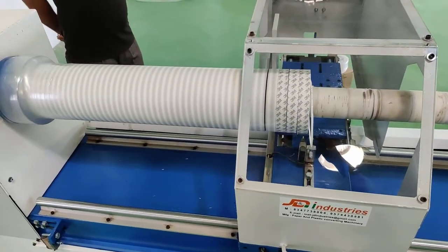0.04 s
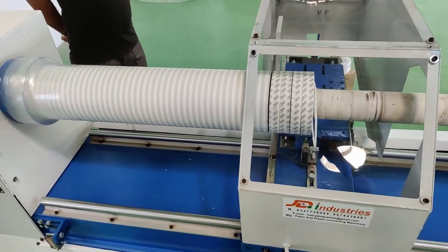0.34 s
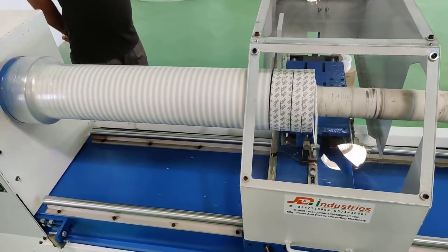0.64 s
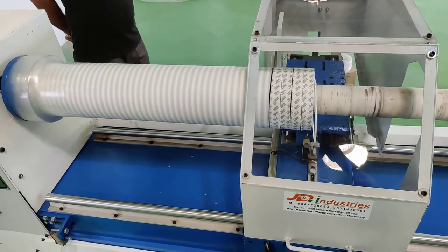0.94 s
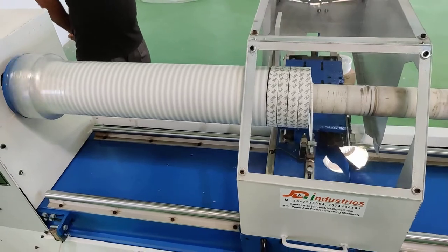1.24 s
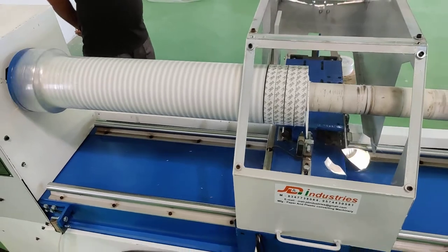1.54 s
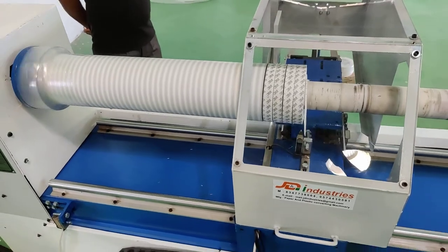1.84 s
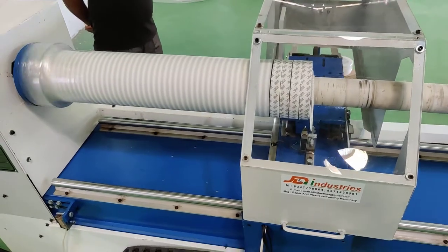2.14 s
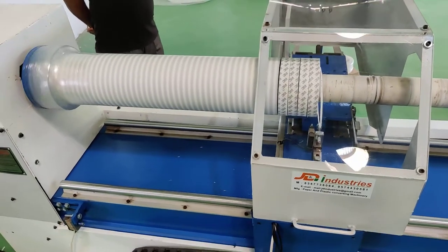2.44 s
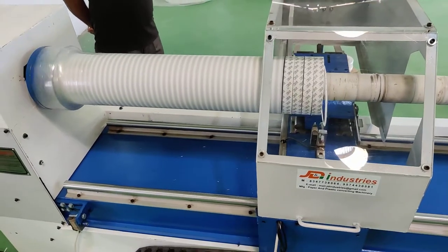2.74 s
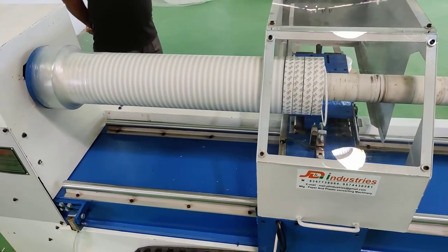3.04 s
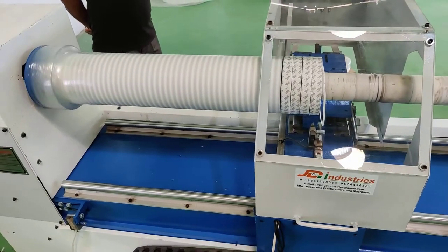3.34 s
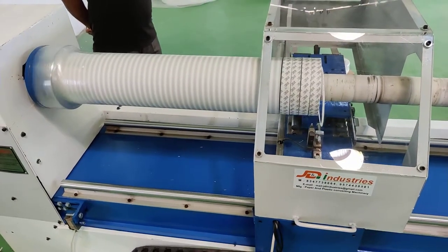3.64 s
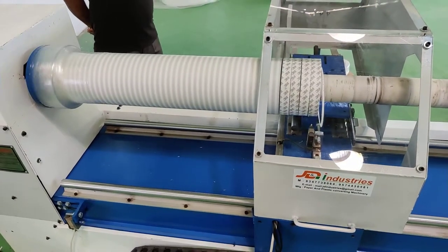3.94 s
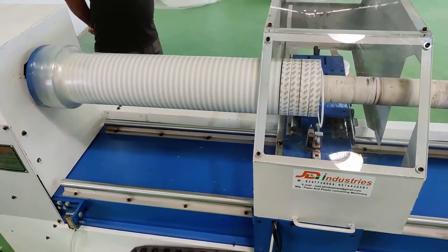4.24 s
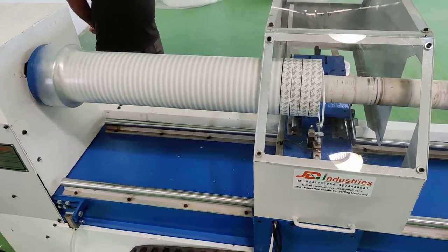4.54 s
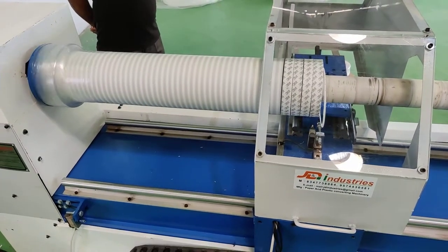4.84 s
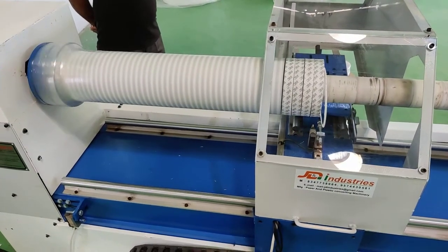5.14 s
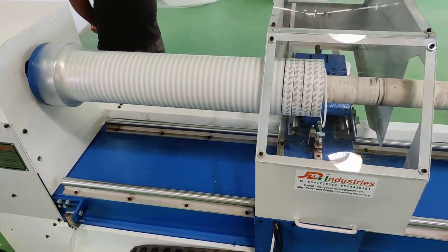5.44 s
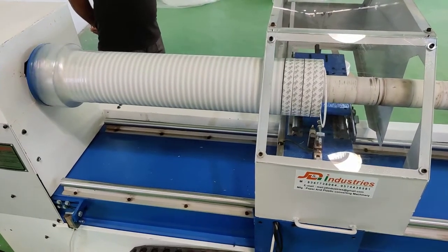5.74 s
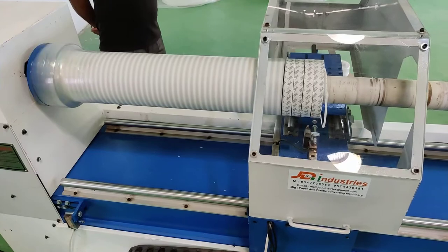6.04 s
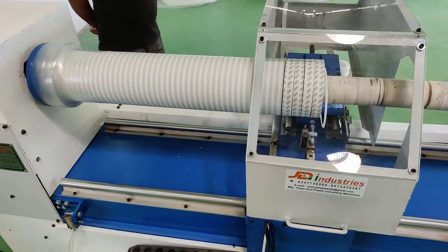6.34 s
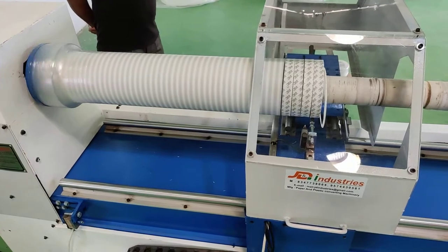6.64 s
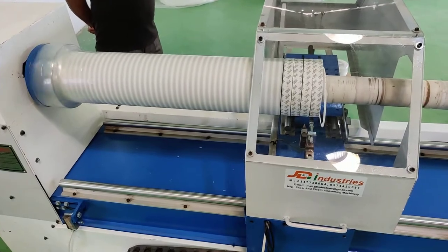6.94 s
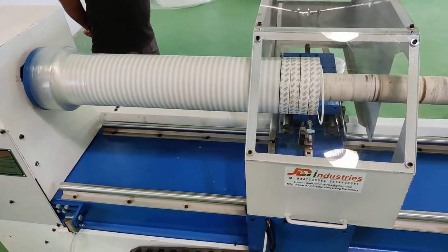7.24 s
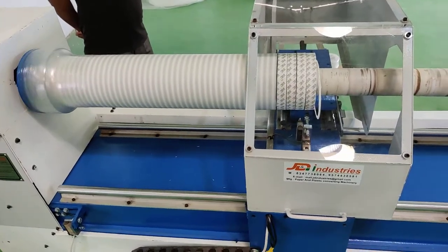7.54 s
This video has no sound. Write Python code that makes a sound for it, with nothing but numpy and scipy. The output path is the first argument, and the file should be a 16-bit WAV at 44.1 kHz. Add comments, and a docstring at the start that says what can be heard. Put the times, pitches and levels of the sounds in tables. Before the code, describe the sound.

A tape slitting machine runs a step away in a factory hall, with a throbbing motor hum, a faint whine and a roar of fan air. Its blade scuffs the spinning roll in a quick rhythm. At the start the machine moans and clacks, the blade squeals and the tape crackles. A deep drone climbs and fades while the motor slowly sags. Around six seconds, more clacks and another moan come.

```python
"""A throbbing motor hum and a roar of fan air: a tape slitting machine, a step away in a factory hall.
The motor slowly sags under load while a second, deep drone climbs; housing panels colour the air.
Rough spots on the spinning roll scuff the blade, twice a turn strongly and once faintly.
Early on the blade sticks, slips and squeals, and the tape crackles as it gives way.
The machine moans and its mechanism clacks near the start and again around 6 s."""
import sys
import numpy as np
from scipy import signal
from scipy.fft import rfft, irfft
from scipy.io import wavfile

SR = 44100
rng = np.random.default_rng(int(sys.argv[2]) if len(sys.argv) > 2 else 0)


def master_out(mix):
    """Clip the mix to full scale and print it as 16-bit PCM to the path in sys.argv[1]."""
    frames = np.transpose(np.atleast_2d(mix))
    ceiling = np.clip(frames, -1, 1)
    pcm = np.round(ceiling * 32767).astype(np.int16)
    wavfile.write(sys.argv[1], SR, pcm)


N = 343098
TIME, HZ = np.arange(N) / SR, np.fft.rfftfreq(N, 1 / SR)

# Stereo balance of the blade noise. Each row: frequency in Hz, left minus right in dB.
BLADE_BALANCE = [(2000, 8), (5000, -1.5), (6000, -6.5), (6700, -6.5), (7300, -0.5), (7900, -1.5)]
BLADE_LAG_S = .00038


def amp(db):
    """Decibels to gain."""
    return 10 ** (np.asarray(db) / 20)


def unit(x):
    """Scale to rms 1."""
    return x / np.sqrt(np.mean(abs(x) ** 2) + 1e-20)


def spectrum(points):
    """Interpolate (Hz, value) points on a log-frequency axis."""
    hz, value = np.transpose(points)
    return np.interp(np.log(HZ + 1), np.log(hz + 1), value)


def curves(rows):
    """Interpolate each value column of (seconds, ..) rows at every sample."""
    time_s, *columns = np.transpose(rows)
    return [np.interp(TIME, time_s, column) for column in columns]


def drift(rate_hz):
    """Smooth random motion of rms 1, up to about rate_hz."""
    count = 4096
    lowpass = np.exp(-.5 * (HZ[:count // 2 + 1] / rate_hz) ** 2)
    slow = irfft(rfft(rng.standard_normal(count)) * lowpass)
    return unit(np.interp(np.arange(N) * count / N, np.arange(count), slow))


def pan(balance_db):
    """Stereo gains for a left-minus-right level."""
    return amp(np.array([[.5], [-.5]]) * balance_db)


def noise(density_db, balance_db, coherence=0, lag_s=0):
    """Stereo noise of a given density per Hz; the coherent part lags on the right."""
    left, other = rfft(rng.standard_normal((2, N)))
    coherence = np.clip(coherence, -1, 1)
    right = coherence * left * np.exp(-2j * np.pi * HZ * lag_s) + np.sqrt(1 - coherence ** 2) * other
    return irfft(np.array([left, right]) * amp(density_db) * pan(balance_db) * np.sqrt(SR / 2), N)


def tone(hz):
    """Sine of rms 1 along a pitch curve."""
    return np.sqrt(2) * np.sin(2 * np.pi * (np.cumsum(hz) / SR + rng.random()))


def bursts(rows, rise_s, hall_db, hall_s):
    """Envelope of blows: fast rise, exponential power decay, hall tail."""
    power = np.zeros(N)
    for start_s, db, decay_s in rows:
        start = int(start_s * SR)
        t = TIME[:N - start][:SR]
        decay = np.exp(-t / decay_s) + amp(hall_db) ** 2 * np.exp(-t / hall_s)
        power[start:start + len(t)] += amp(db) ** 2 * decay * (1 - np.exp(-t / rise_s))
    return np.sqrt(power)


def rough_tones(rows, roughness, balance_db):
    """Brief swelling tones, unsteady in pitch and strength."""
    out = np.zeros((2, N))
    for start_s, length_s, hz, db, width_hz in rows:
        active = (TIME >= start_s) & (TIME < start_s + length_s)
        t = TIME[active] - start_s
        swell = amp(db) * np.sqrt(abs(np.sin(np.pi * t / length_s)))
        for side in out:
            jitter = drift(width_hz / 2) + 1j * drift(width_hz / 2)
            ring = unit(1 + roughness * jitter[active]) * np.exp(2j * np.pi * hz * t)
            side[active] += np.sqrt(2) * swell * ring.real
    return out * pan(balance_db)


def motor(throb_db=1.5, throb_hz=4, wander_hz=.25, jitter_hz=.25, upper_db=-46):
    """Five throbbing shaft orders sag under load; the higher ones are less steady in pitch."""
    # Each row: time in seconds, shaft speed in Hz.
    shaft_speed = [(0, 38.1), (.2, 38.6), (.87, 38.9), (1.25, 37.2), (1.75, 38.7), (3.25, 38.8),
                   (4.55, 37.3), (5.25, 35.8), (5.8, 36.3), (6.25, 35.4), (6.6, 35.3), (6.9, 34.7),
                   (7.78, 35)]
    # Each row: time in seconds, levels of orders 1, 2 and 3 in dB.
    order_levels = [(0, -37, -32, -32.5), (.3, -27, -31.5, -32), (.75, -32.5, -45, -30.5),
                    (1.05, -41, -26, -27), (1.2, -36, -35, -44.5), (1.8, -42, -29, -33),
                    (2.02, -31, -37.5, -38.5), (2.25, -34, -26, -37), (2.45, -23.5, -48, -36.5),
                    (2.8, -32.5, -32, -35.5), (3.0, -24.5, -37.5, -49), (3.27, -32, -26, -28),
                    (3.4, -28, -48, -43), (3.62, -30, -29, -32), (3.82, -33.5, -33, -41),
                    (4.38, -28.5, -35.5, -31), (4.55, -25, -24.5, -45), (4.92, -21.5, -34.5, -54),
                    (5.28, -31, -24.5, -41), (5.48, -24, -34.5, -48), (5.75, -34, -28, -32),
                    (6.12, -30.5, -41, -34), (6.5, -41, -29.5, -41), (6.72, -42, -35, -43),
                    (6.88, -36, -24.5, -45), (7.08, -28, -33, -43), (7.3, -35, -28, -44),
                    (7.78, -30, -26, -44)]
    shaft_hz = curves(shaft_speed)[0] + wander_hz * drift(3.96)
    hum = 0
    for order, db in enumerate(curves(order_levels) + [upper_db, upper_db], 1):
        hz = order * shaft_hz + jitter_hz * (order - 1) ** 2 * drift(throb_hz)
        hum += amp(db + throb_db * drift(throb_hz)) * tone(hz)
    return hum * pan(.39)


def drone(gain_db=-1, throb_db=1.5, throb_hz=4, wander_hz=.66):
    """A deep, throbbing tone climbs, then fades."""
    # Each row: time in seconds, pitch in Hz, relative level in dB.
    climb = [(0, 23.5, -42), (1.7, 28, -34), (2.12, 32.6, -24), (2.38, 30.8, -24), (2.65, 35, -27),
             (3.3, 42, -28), (3.55, 48, -46), (4.05, 55, -27), (4.3, 54.5, -29), (4.6, 60, -29.5),
             (4.95, 65, -33), (5.2, 70, -33), (5.5, 71.5, -42), (5.8, 71.5, -65)]
    hz, db = curves(climb)
    level = amp(db + gain_db + throb_db * drift(throb_hz))
    return level * tone(hz + wander_hz * drift(throb_hz)) * pan(.39)


def fan_air(gust_hz=2, flutter_db=.5, flutter_hz=25):
    """Fan and hall noise lifted by panel resonances; three bands share a swell and gust separately."""
    # Hall rumble and wash. Each row: frequency in Hz, density in dB per Hz.
    hall = [(8, -56), (22, -50.5), (55, -52.5), (100, -49.5), (135, -54.5), (185, -59), (250, -65),
            (620, -67.5), (1000, -70.5), (1300, -68.5), (1750, -74.5), (3600, -84), (6500, -87),
            (8600, -105), (10200, -106.5), (11500, -117), (13000, -120)]
    # Housing resonances. Each row: frequency in Hz, width in Hz, lift in dB.
    panels = [(235, 14, 2.6), (294, 26, 7.2), (387, 14, 3.9), (426, 60, 8), (477, 7, 3.9), (520, 60, 3.6),
              (573, 47, 5.4), (689, 46, 8.8), (723, 15, 5), (751, 41, 9.7), (802, 60, 12.2), (853, 20, 6.7),
              (882, 32, 6.6), (929, 26, 4.6), (964, 27, 4.2), (1028, 60, 5), (1123, 7, 4), (1163, 25, 4.2),
              (1208, 20, 3), (1403, 14, 3.3), (1438, 15, 3.1), (2300, 550, 2.4)]
    # Each row: frequency in Hz, left minus right in dB.
    balance = [(60, 1), (500, -0.5), (850, 2), (1500, -0.2), (2500, -3.5), (4000, -2), (6000, -3.5),
               (6800, -15), (8000, 1)]
    # Each row: frequency in Hz, left-right coherence from 0 to 1.
    coherence = [(60, 1), (130, 0.97), (250, 0.93), (480, 0.9), (780, 0.62), (1100, 0)]
    # Each row: time in seconds, swell of the rumble in dB.
    swell = [(0, 1), (1.8, 0.4), (3.2, 0), (3.7, 1), (4.7, -0.3), (5.4, 0.25), (6.1, 1.5), (6.65, -0.75),
             (7.78, -0.6)]
    lift_db = sum(db / (1 + (2 * (HZ - hz) / width_hz) ** 2) for hz, width_hz, db in panels)
    wash = rfft(noise(spectrum(hall) + lift_db, spectrum(balance), spectrum(coherence), lag_s=.00008))
    rumble = 1 / (1 + (HZ / 520) ** 4)
    hiss = 1 - 1 / (1 + (HZ / 1150) ** 4)
    roar = 1 - rumble - hiss
    swell_db = curves(swell)[0]
    out = 0
    for band, swell_share, gust_db in [(rumble, 1, -.3), (roar, .82, .5), (hiss, .5, .36)]:
        level_db = swell_share * swell_db + gust_db * drift(gust_hz) + flutter_db * drift(flutter_hz)
        out += irfft(wash * band, N) * amp(level_db)
    return out


def whines(waver_db=2, reflection_gain=.91):
    """Fan and drive tones; reflections make each side waver differently."""
    # Each row: pitch in Hz, level in dB, wander in Hz.
    tones = [(756, -46, 2.5), (1208, -55, 3), (1704, -62, 1.2)]
    out = np.zeros((2, N))
    for hz, db, wander_hz in tones:
        pitch_hz = hz + wander_hz * drift(4.95)
        direct = tone(pitch_hz)
        for side in out:
            level = amp(db + waver_db * drift(7.8))
            reflected = reflection_gain * tone(pitch_hz + wander_hz * drift(5.6))
            side += level * unit(direct + reflected)
    return out


def moans():
    """Brief machine moans, plus a rough low rumble and swell from the motor early on."""
    # Each row: start in seconds, length in seconds, pitch in Hz, level in dB, width in Hz.
    tones = [(0, .14, 800, -28, 70), (.088, .035, 780, -26, 50), (.01, .07, 2345, -49, 120),
             (.15, 1, 100, -37, 50), (.29, .085, 795, -29, 40), (.28, .25, 180, -33, 25),
             (5.88, .38, 565, -36.5, 18), (6, .22, 695, -35.5, 70), (6.04, .15, 790, -34.5, 60),
             (6.04, .17, 885, -40.5, 40), (6, .25, 1128, -45, 20), (5.95, .2, 1205, -49, 25)]
    return rough_tones(tones, roughness=.55, balance_db=1.5)


def roll_scuff(spindle_hz=8.86, rub_db=-8, runout_db=2, uneven_db=4, rise_turns=.036, slip_turns=.004):
    """Rough spots on the roll pass the blade each turn and scuff over a grainy rub."""
    # Each row: place in the turn from 0 to 1, decay in turns, relative level in dB.
    rough_spots = [(.155, 0.024, -2), (.41, 0.034, -4.5), (.555, 0.049, -14)]
    # Blade on tape. Each row: frequency in Hz, relative density in dB.
    rub_spectrum = [(1000, -100), (2500, -82), (4200, -83), (5100, -83), (5550, -77.5), (6000, -82.5),
                    (6600, -84), (7300, -89), (8200, -92), (9000, -106), (13000, -116)]
    # Fine fizz above the rub. Each row: frequency in Hz, relative density in dB.
    fizz_spectrum = [(7000, -130), (10500, -111), (11700, -111), (12400, -107), (13300, -110)]
    # Each row: time in seconds, fizz gain in dB.
    fizz_gain = [(0, 7), (.45, 7.5), (.9, 6.5), (1.3, 5), (1.6, 1), (3.2, -1), (4.7, -2.5), (5.8, 0),
                 (6.7, 3), (7.78, 1)]
    # Blade pressure on the roll. Each row: time in seconds, rub gain in dB.
    pressure = [(0, 7.5), (.1, 0), (.25, 5), (.36, 9), (.45, 5), (.6, 3), (.9, -2), (2, 2), (4, 0.5),
                (5.7, -1), (6.4, 0), (6.6, -2), (7.2, 0), (7.78, -7)]
    turns = spindle_hz * TIME + slip_turns * drift(.72)
    spot_power = 0
    for place, decay_turns, db in rough_spots:
        since = (turns - place) % 1
        spot_power += amp(db) ** 2 * np.exp(-since / decay_turns) * (1 - np.exp(-since / rise_turns))
    # Out-of-round roll: hardest rub at mid-turn.
    contact = amp(rub_db - runout_db * np.cos(2 * np.pi * turns))
    envelope = np.sqrt(2 * spot_power * amp(uneven_db * drift(14)) ** 2 + contact ** 2)
    grain = unit(amp(1.5 * drift(200)))
    rub = noise(spectrum(rub_spectrum), spectrum(BLADE_BALANCE), coherence=.52, lag_s=BLADE_LAG_S)
    fizz = noise(spectrum(fizz_spectrum), balance_db=1, coherence=.38) * amp(curves(fizz_gain)[0])
    return (rub * amp(curves(pressure)[0]) + fizz) * envelope * grain


def blade_squeals():
    """The blade sticks and slips with a raspy ring."""
    # Each row: start in seconds, length in seconds, pitch in Hz, level in dB, width in Hz.
    modes = [(.055, .11, 6140, -56, 80), (.09, .14, 6165, -44.5, 90), (.18, .21, 6140, -44.5, 130),
             (.28, .12, 5430, -56, 160), (.38, .24, 6160, -56, 90), (.64, .13, 3980, -56, 110),
             (.65, .21, 5430, -57, 100), (.86, .22, 5455, -58, 90), (1.05, .3, 6240, -57, 80),
             (1.338, .19, 6250, -53.5, 70), (2.49, .19, 4247, -55, 140)]
    return rough_tones(modes, roughness=1.7, balance_db=-6.5)


def clacks(rise_s=.0015):
    """Metal knocks in the mechanism: a crack with a short hall tail, plus ringing modes."""
    # Each row: start in seconds, gain in dB, power decay in seconds.
    knocks = [(.305, 0, .008), (.332, -10, .007), (.362, -13, .008), (.401, -6, .006), (5.841, -2.5, .007),
              (5.868, -11, .005), (5.918, -10, .004), (6.258, -12, .01)]
    # Each row: frequency in Hz, relative density in dB.
    crack_spectrum = [(500, -57.5), (1500, -72), (2100, -68), (2550, -63), (2950, -69), (3350, -66),
                      (3900, -70), (5800, -71), (7200, -79), (9000, -100), (13000, -114)]
    # Each row: frequency in Hz, relative level in dB, T60 in seconds.
    metal_modes = [(1970, -46, .15), (2200, -41, .2), (2510, -37, .1), (2890, -46, .12), (3290, -39, .07),
                   (3640, -46, .09), (5000, -45, .1), (5790, -46, .15)]
    out = noise(spectrum(crack_spectrum), balance_db=2) * bursts(knocks, rise_s, hall_db=-13, hall_s=.06)
    for start_s, db, _ in knocks:
        start = int(start_s * SR)
        t = TIME[:N - start][:SR // 2]
        for hz, mode_db, t60_s in metal_modes:
            envelope = amp(db + mode_db - 60 * t / t60_s) * (1 - np.exp(-t / rise_s))
            out[:, start:start + len(t)] += envelope * np.sin(2 * np.pi * (hz * t + rng.random((2, 1))))
    return out


def tape_snaps(snag_period_s=.1113, snag_turns=7):
    """Tape gives way at the blade in bright crackles; snags recur about once a turn, weaker each time."""
    # Each row: first snap in seconds, gain in dB, change per turn in dB, power decay in seconds.
    snags = [(.373, 7, -2.5, 0.002), (.397, 2, -2, .0035)]
    # Each row: start in seconds, gain in dB, power decay in seconds.
    single_snaps = [(.595, -3, .002), (.703, 1, .0025), (.843, -2, .0025), (.956, -7, .002),
                    (1.066, -1, .002), (2.392, -4.5, .004), (3.403, -6, .0066), (5.662, -8, .005),
                    (5.804, -6, .003), (6.27, -6, .024), (6.372, -5, .003), (6.468, -6, .003)]
    # Each row: frequency in Hz, relative density in dB.
    snap_spectrum = [(2500, -81), (4500, -81), (5500, -72.5), (7000, -73.5), (8300, -98), (9500, -99),
                     (13000, -110)]
    repeats = [(start_s + turn * snag_period_s, db + turn * change_db, decay_s)
               for start_s, db, change_db, decay_s in snags for turn in range(snag_turns)]
    crack = noise(spectrum(snap_spectrum), spectrum(BLADE_BALANCE), coherence=.44, lag_s=BLADE_LAG_S)
    return crack * bursts(repeats + single_snaps, rise_s=.0004, hall_db=-19, hall_s=.04)


def scene():
    """The whole machine, in stereo."""
    running = motor() + drone() + fan_air() + whines()
    return running + moans() + roll_scuff() + blade_squeals() + clacks() + tape_snaps()


def record(dry, cutoff_hz=13500, fade_s=.002):
    """Fade both ends, then low-pass."""
    fade = np.minimum(np.minimum(TIME, TIME[::-1]) / fade_s, 1)
    lowpass = signal.firwin(511, cutoff_hz, window=("kaiser", 9), fs=SR)
    return signal.oaconvolve(dry * fade, lowpass[None], "same")


dry = scene()
out = record(dry)
master_out(out)
```